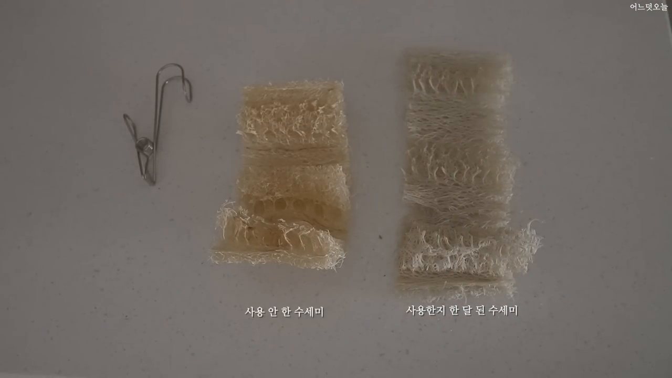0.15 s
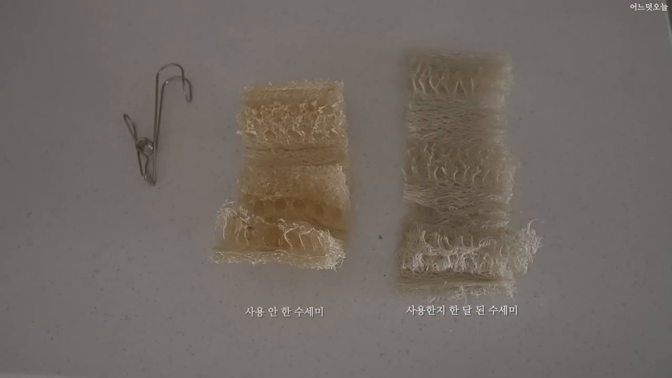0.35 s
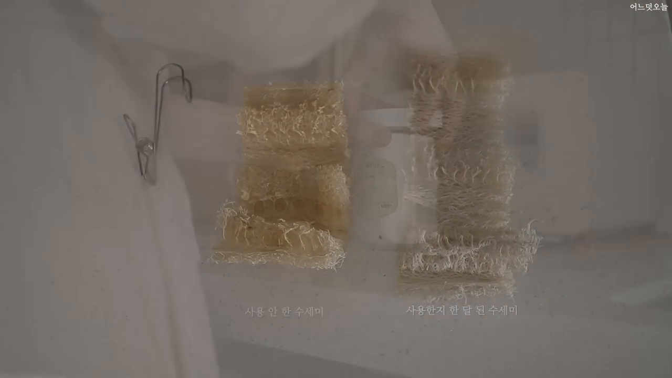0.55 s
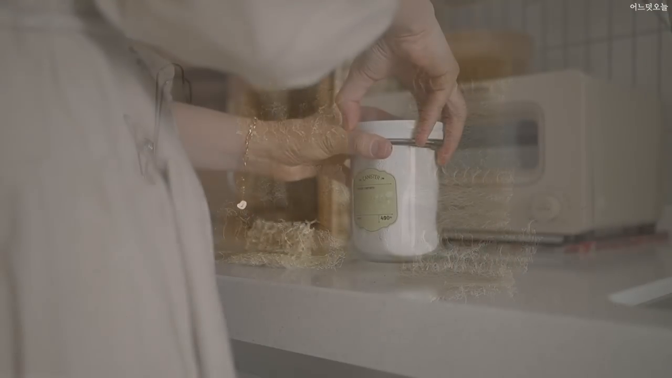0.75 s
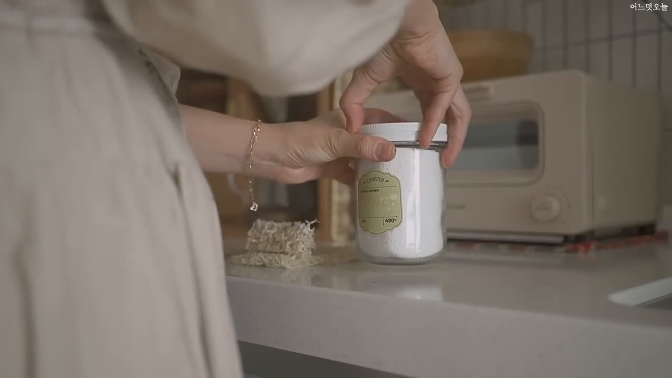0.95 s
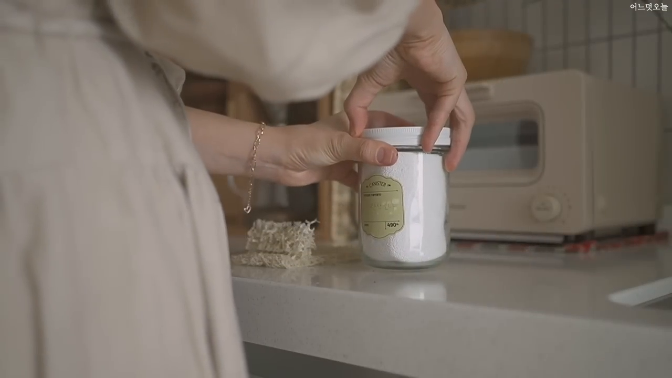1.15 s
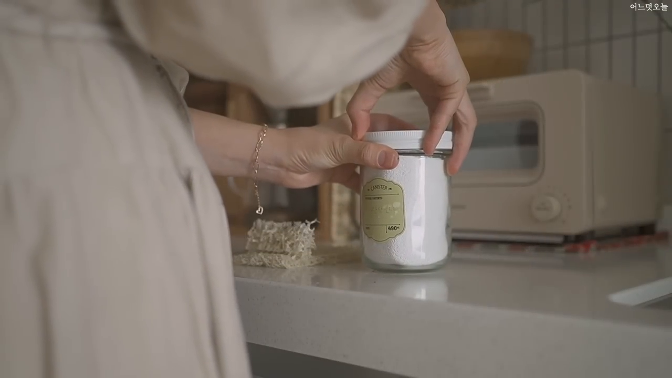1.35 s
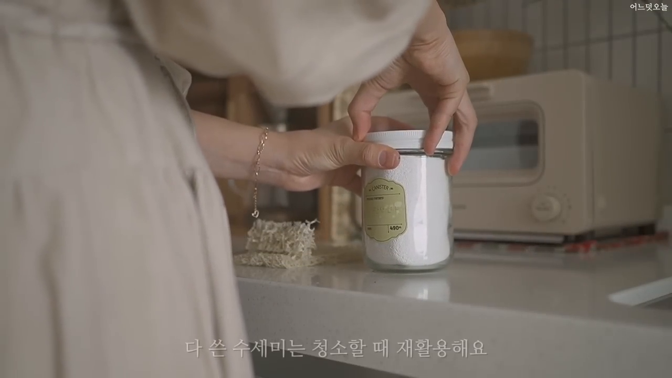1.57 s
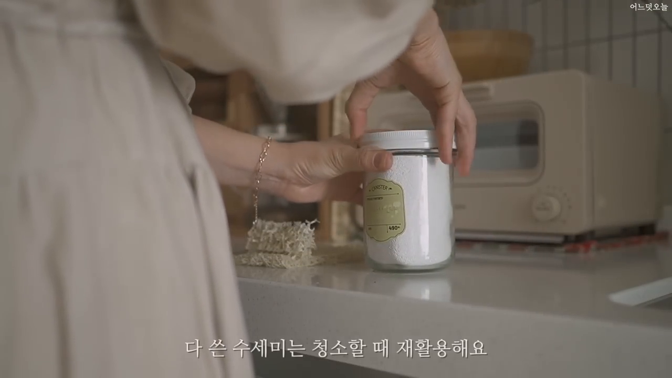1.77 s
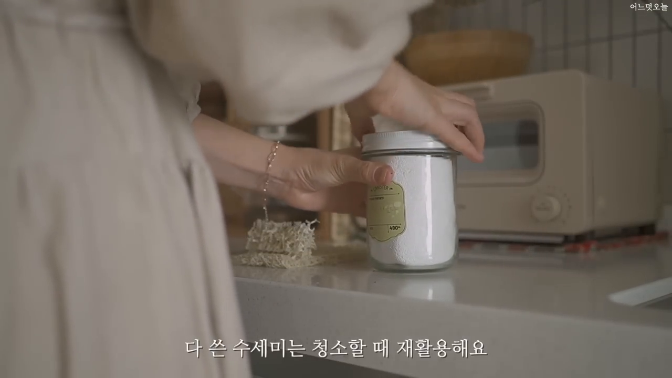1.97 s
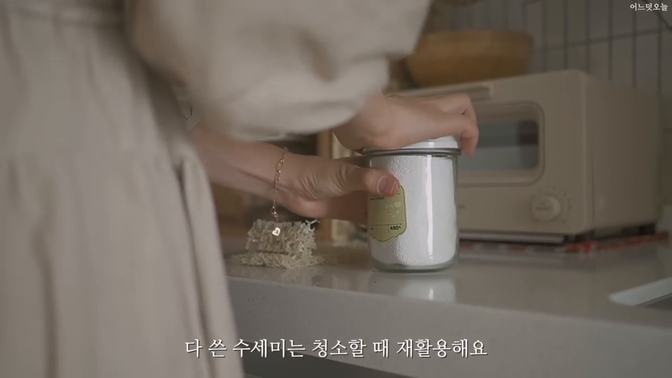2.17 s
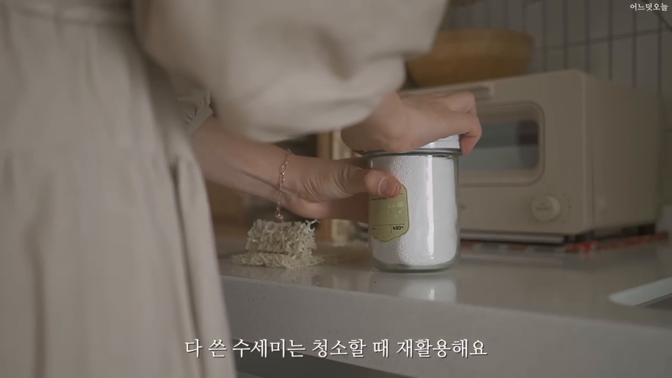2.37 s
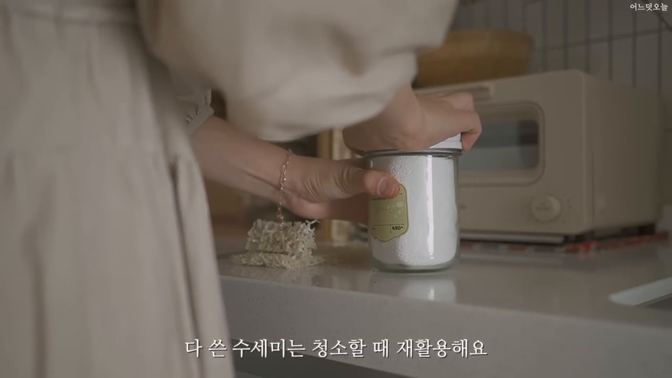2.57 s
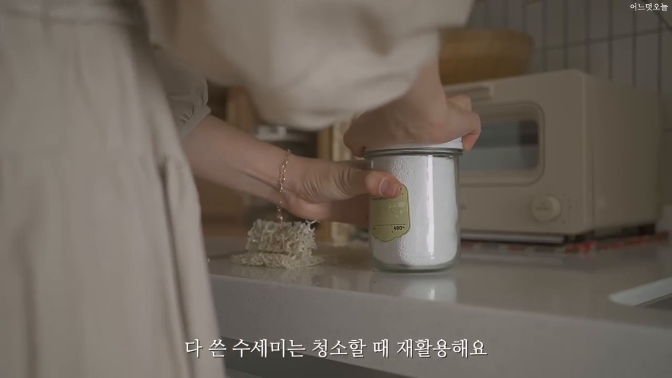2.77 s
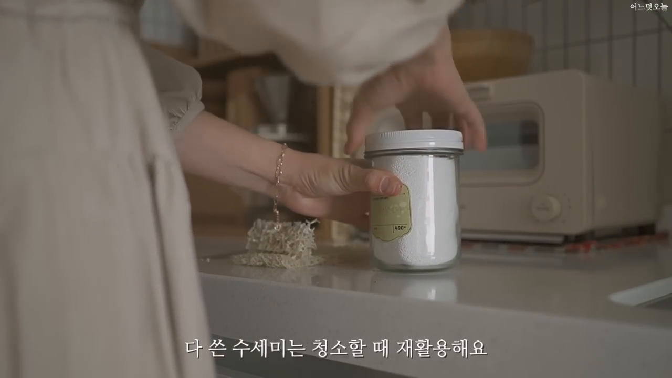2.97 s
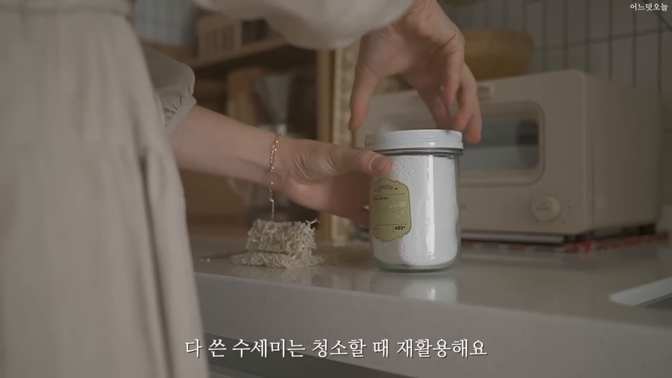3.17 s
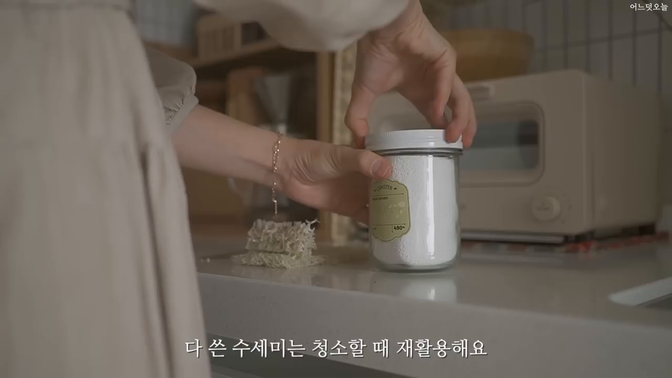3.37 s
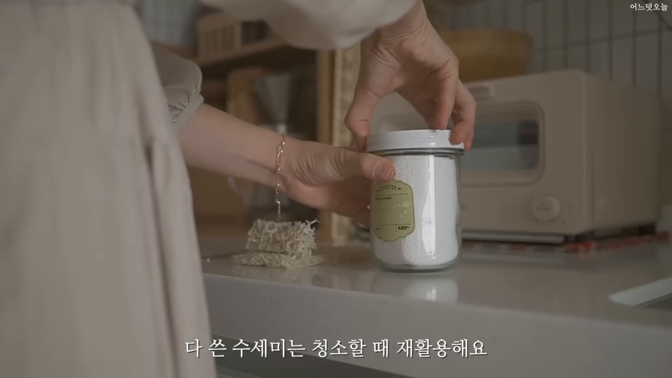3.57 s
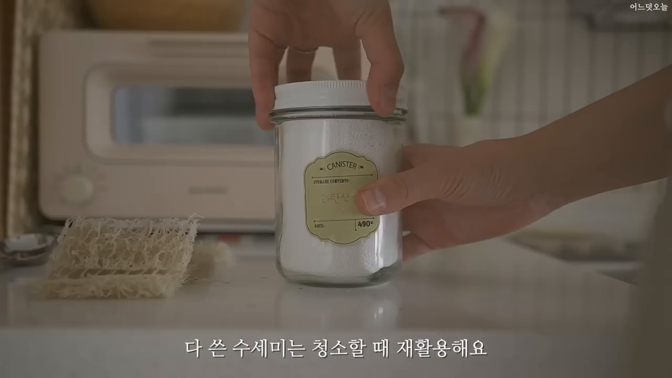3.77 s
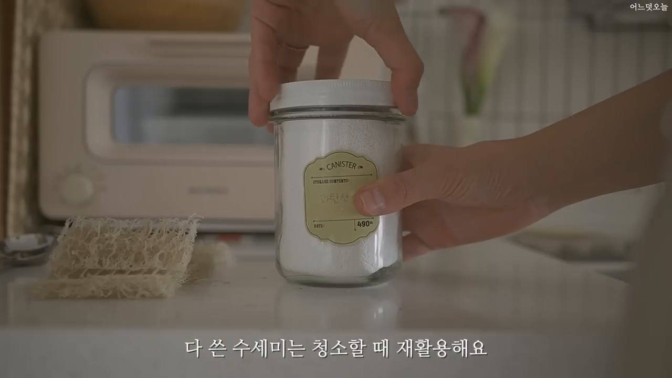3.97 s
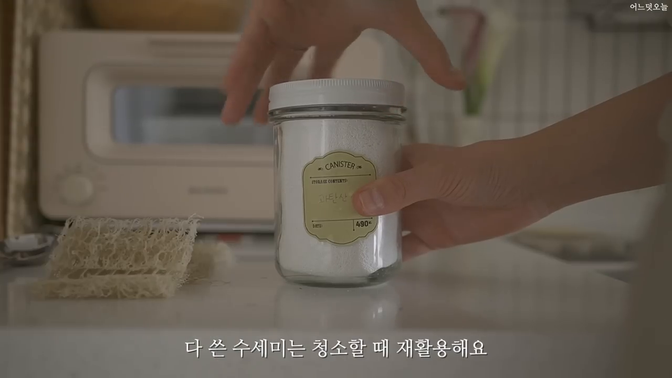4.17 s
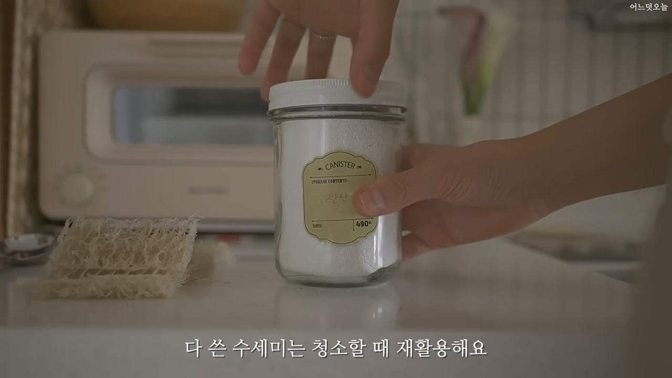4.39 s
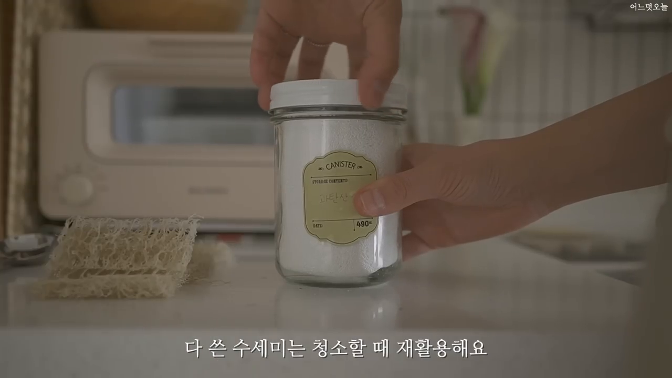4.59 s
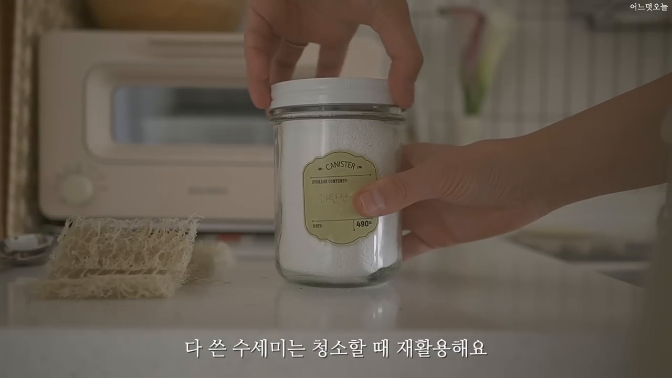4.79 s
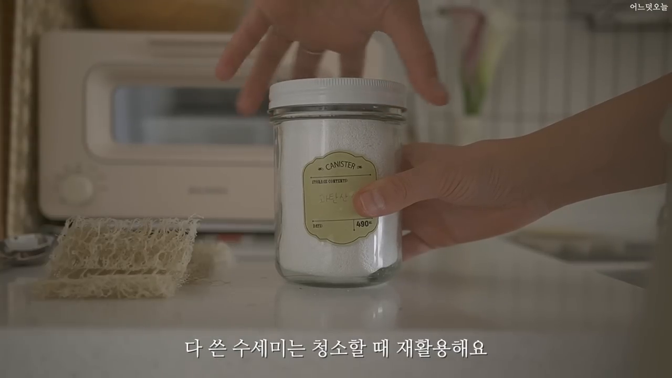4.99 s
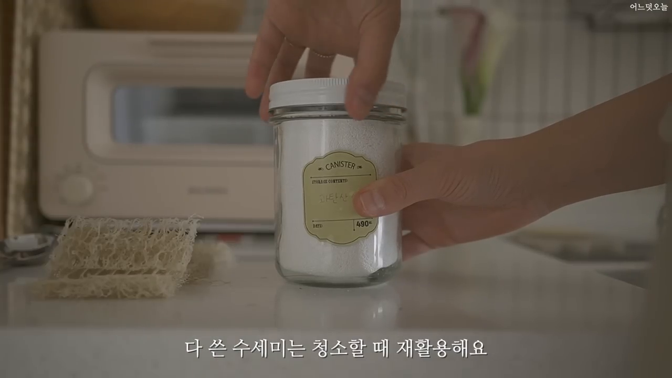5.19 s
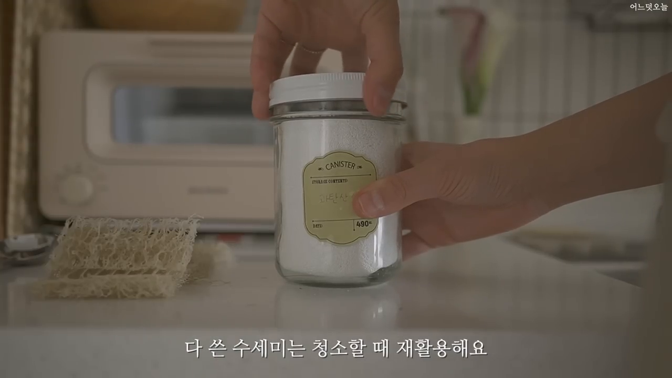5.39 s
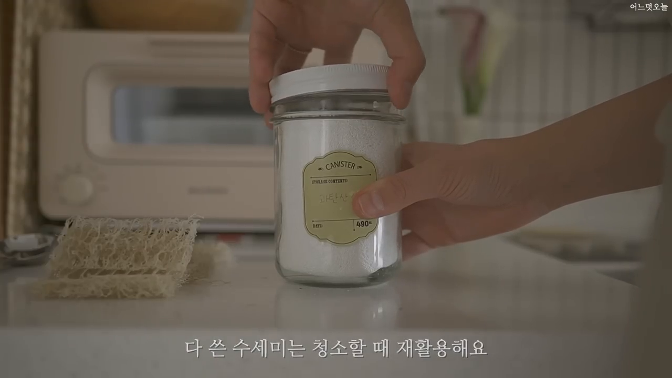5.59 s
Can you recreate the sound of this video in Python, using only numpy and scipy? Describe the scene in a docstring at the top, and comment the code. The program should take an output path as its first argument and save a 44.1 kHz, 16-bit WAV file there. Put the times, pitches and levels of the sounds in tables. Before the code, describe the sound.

Close, dry kitchen handling. Faint rumble and hiss open for over a second, then a plastic lid knocks and rubs on a full glass jar with low, woody counter booms. A brighter glassy scrape follows, then near quiet. The sound cuts abruptly and fades back in, with two clusters of firmer twisting strokes and clacks, a pause, and light rattly scrapes at the end.

```python
"""A hand twists a plastic screw lid on a full glass jar standing on a kitchen counter.
The thread rubs and slips in short strokes: random slips make the counter boom and the lid and jar ring.
A finer, denser scrape gives the hiss of rubbing. Taps on the lid ring and crack along with many strokes.
The sound drops out once and fades back in with other resonances. A quiet hiss lies under it all."""
import sys
import numpy as np
from scipy import signal
from scipy.fft import rfft, irfft, next_fast_len
from scipy.io import wavfile
from scipy.ndimage import uniform_filter1d, map_coordinates

SR = 44100
rng = np.random.default_rng(int(sys.argv[2]) if len(sys.argv) > 2 else 0)


def store_wav(level_fs):
    """Save 16-bit WAV to argv[1]."""
    pcm = np.round(np.clip(np.atleast_2d(level_fs), -1, 1) * 32767)
    wavfile.write(sys.argv[1], SR, pcm.T.astype(np.int16))


N = 248724  # length in samples

# Moments when the resonances change [s]: the palm presses down and the glass rings freely,
# the hand grips the glass again, the sound drops out, the lid comes off the thread.
LOOSE_S, HELD_S, GAP_S, LIFT_S = 2.45, 3.0, 3.743, 5.572


def amp(db):
    """Turn decibels into a gain."""
    return 10 ** (np.asarray(db) / 20)


def unit(x):
    """Scale to an average (RMS) strength of 1."""
    return x / np.sqrt(np.mean(x ** 2) + 1e-20)


def curves(rows):
    """Draw straight lines between the rows: one value per sample for each column after the time."""
    time_s, *columns = np.transpose(rows)
    return [np.interp(np.arange(N) / SR, time_s, column) for column in columns]


def wobble(rate, size=N):
    """A smooth random curve through `rate` random points a second."""
    points = rng.standard_normal(int(size * rate / SR) + 4)
    return map_coordinates(points, [np.arange(size) * rate / SR])


def filtered(x, response):
    """Change the strength of each frequency in x by the given response."""
    size = next_fast_len(N + SR // 2)
    hz = np.fft.rfftfreq(size, 1 / SR)
    return irfft(rfft(x, size) * response(hz), size)[:N]


def colour(points):
    """A filter gain drawn through (frequency [Hz], level [dB]) points, spaced by pitch."""
    point_hz, db = np.transpose(points)
    return lambda hz: amp(np.interp(np.log(hz + 1), np.log(point_hz + 1), db))


def slips(per_s, spread_db, smooth):
    """Friction force: random slips of uneven size over a smooth scrape, evened out in strength."""
    hit = rng.random(N) < per_s / SR
    direction = np.sign(rng.standard_normal(N))
    size = amp(spread_db * rng.standard_normal(N)) * direction
    force = unit(hit * size) + smooth * rng.standard_normal(N)
    nearby_power = np.abs(uniform_filter1d(force ** 2, size=900))
    return force / np.sqrt(nearby_power + 0.07)


def ringing(force, db, modes):
    """The force drives each resonance; the contact wanders, so their shares keep shifting."""
    out = np.zeros(len(force))
    for hz, width, level in modes:
        b, a = signal.iirpeak(hz, hz / width, SR)

        def resonate(x):
            """Pass the resonance twice, for steep flanks."""
            return signal.lfilter(b, a, signal.lfilter(b, a, x))

        share_db = 2.5 * wobble(40, size=len(force))
        driven = resonate(force * amp(db + share_db))
        out += amp(level) * np.sqrt(width) * driven / np.std(resonate(force))
    return out / np.sqrt(sum(amp(level) ** 2 * width for _, width, level in modes))


def by_state(force, db, states):
    """Each (start [s], resonances) state rings until the next one begins."""
    edges = [round(start * SR) for start, _ in states] + [N]
    lead = SR // 20  # start early so the resonances can build up
    parts = []
    for (_, modes), begin, end in zip(states, edges, edges[1:]):
        early = max(begin - lead, 0)
        part = ringing(force[early:end], db[early:end], modes)
        parts.append(part[begin - end:])
    return np.concatenate(parts)


def twisting():
    """The thread judders; each part of jar and counter answers the same uneven grip."""
    boom_db, lid_db, jar_db, neck_db, rub_db = grip()
    judder = wobble(90)
    push = slips(500, spread_db=4, smooth=0.9411) * amp(0.838 * judder)
    grit = slips(500, spread_db=1.0, smooth=1.0) * amp(0.5028 * judder)
    low_parts = counter(push, boom_db) + thud(push, boom_db) + lid(push, lid_db)
    glass_parts = jar(grit, jar_db) + neck(grit, neck_db)
    return low_parts + glass_parts + rub(judder, rub_db)


# Jerks and slides of the lid: (full strength [s], rise [s per 20 dB], hold [s], fall [s per 20 dB],
# boom [dB], lid [dB], jar ring [dB], neck ring [dB], rub hiss [dB]); rise, hold, fall ignore the sign
JERKS = [ (1.399, 0.0047, .001, .01, -27, -25, -48, -66, -72),
         (1.408, 0.0131, 0.06818, 0.0784, -30, -32.5, -61.5, -78.5, -82.5),
         (1.485, 0.1121, 0.033, 0.1095, -38, -39.5, -62, -64, -62),
         (1.585, -0.0026, .001, .01, -30, -28.5, -44, -64, -68),
         (1.593, 0.011, 0.009768, -0.032, -27.5, -29.5, -60.5, -82.5, -82.5),
         (1.619, 0.0244, 0.06345, .1, -30, -33, -53, -74, -79),
         (1.728, .03, .01, .03, -37, -45, -60, -62, -62),
         (1.702, 0.0703, 0.6107, 0.0564, -55.5, -56.5, -59.5, -60.5, -59.5),
         (1.749, .01, .016, .033, -25, -30, -49.5, -54.5, -52),
         (1.823, 0.0102, 0.01084, -0.0224, -32.5, -34.5, -54.5, -56.5, -56),
         (1.835, 0.0245, 0.001788, 0.0159, -24, -29, -51.5, -51, -50),
         (1.874, -0.0759, 0.05104, -0.0421, -34.5, -50.5, -73, -74, -66.5),
         (1.944, -0.001, 0.00999, 0.0575, -29, -39, -58, -58.5, -58),
         (1.956, 0.0156, 0.013105, 0.0359, -21.5, -32, -51, -53, -54),
         (2.031, 0.1145, 0.01225, 0.0571, -51.5, -44, -56, -66.5, -58),
         (2.066, 0.0097, 0.021307, -0.0079, -25.5, -35, -53.5, -51.5, -50.5),
         (2.104, -0.3745, 0.0097, 0.3293, -40.5, -52, -72, -64, -70.5),
         (2.340, 0.0006, 0.003287, .014, -41, -35, -35, -57.5, -60),
         (2.341, -0.0105, 0.011084, -0.0173, -41.5, -57.5, -59, -55, -54),
         (2.523, .02, .002, .012, -55.5, -67.5, -62.5, -67, -67.5),
         (2.554, .006, 0.003045, 0.0404, -40, -30, -40, -47.5, -52.5),
         (2.593, 0.0108, 0.009625, 0.0502, -31, -26.5, -30.5, -34, -38),
         (2.642, .02, .008, .022, -17, -32, -31, -37, -36),
         (2.662, 0.0167, .01, .13, -25.5, -38, -39, -43, -44),
         (2.735, .08, .045, .11, -33, -42, -42, -46, -50),
         (2.853, 0.1225, 0.00439, .16, -44, -51, -63, -60, -54.5),
         (2.972, .06, 0.00502, .04, -46, -56, -67, -62, -61),
         (3.048, 0.0121, .03, .014, -27, -42, -52.5, -51, -51),
         (3.141, 0.0489, 0.02939, 0.0811, -44, -56, -78, -74.5, -78),
         (3.101, 2.3557, 0.4787, 0.6814, -62.5, -66, -68.5, -67.5, -68.5),
         (3.394, -0.1844, 0.00464, 0.1886, -54, -60.5, -70, -72.5, -70),
         (3.521, 0.0909, 0.00189, 0.0696, -51, -49, -60, -71, -68),
         (3.628, 0.2196, 0.04547, 0.0852, -57, -58.5, -66, -67.5, -64.5),
         (3.729, 0.0533, 0.00867, 0.0138, -47.5, -43.5, -53, -54.5, -58),
         (3.800, .03, 0.001922, 0.0156, -59, -52, -58, -63.5, -59),
         (3.848, 0.0034, 0.012253, 0.0405, -28, -28, -41, -48.5, -46.5),
         (3.897, 0.0217, .03, .025, -42.5, -47, -52, -65, -57.5),
         (3.967, 0.0018, 0.00555, 0.0633, -19, -19.5, -57, -48.5, -46),
         (3.999, 0.0425, 0.01353, 0.0287, -26, -23, -32.5, -46, -40.5),
         (4.028, -0.0175, 0.007484, 0.0368, -21, -37.5, -51.5, -55.5, -50),
         (4.078, .012, 0.03785, 0.0367, -33, -35, -42.5, -52, -56),
         (4.119, 0.0582, 0.018267, 0.0322, -31, -30, -34.5, -48, -41),
         (4.188, 0.7529, .01, 0.3273, -56.5, -63.5, -78, -78, -76.5),
         (4.522, -0.0191, 0.01594, 0.6171, -49, -52.5, -58, -68, -58.5),
         (4.549, .012, 0.001925, .018, -39, -33, -44, -55.5, -48),
         (4.566, 0.0129, 0.00441, -0.0043, -40.5, -40.5, -46, -56, -46.5),
         (4.607, 0.0041, 0.01692, 0.0835, -44, -41.5, -50, -56.5, -51.5),
         (4.637, 0.0167, 0.010965, 0.0008, -44, -30, -46, -49, -48),
         (4.654, 0.0301, 0.018723, 0.0145, -37, -28.5, -38, -44.5, -44.5),
         (4.725, 0.0377, .008, 0.0607, -31, -33, -60, -56.5, -50.5),
         (4.743, 0.0286, 0.03054, 0.0354, -31, -28, -34.5, -49, -43),
         (4.805, 0.0076, 0.02474, 0.0421, -34, -35.5, -42, -56, -53.5),
         (4.835, 0.0315, 0.004817, 0.0466, -35, -31, -39, -47.5, -48.5),
         (4.861, .025, .003, .02, -49.5, -47.5, -46, -49, -44.5),
         (4.904, -0.6924, 0.00949, 0.2149, -59.5, -69.5, -74, -80.5, -73),
         (5.298, .011, 0.01068, 0.0722, -39.5, -39, -44, -45, -46),
         (5.326, 0.0022, 0.0049, 0.0713, -45.5, -46, -43, -53, -52),
         (5.353, 0.0204, 0.00761, -0.0794, -38.5, -36.5, -49.5, -51, -53),
         (5.378, 0.0568, 0.01073, -0.0541, -40.5, -43, -58, -59, -58.5),
         (5.396, 0.0187, 0.00835, -0.0763, -40, -39.5, -46.5, -55, -49),
         (5.415, .006, .008, .022, -39, -31, -44, -41, -40),
         (5.463, 0.0593, 0.0122, 0.2783, -42, -45.5, -56, -60, -57),
         (5.489, 0.0505, 0.0426, 0.0761, -39.5, -40, -49.5, -53.5, -52),
         (5.553, 0.0526, 0.0165, -0.23, -41.5, -40, -55.5, -57, -60),
         (5.579, .012, .016, .02, -46, -40, -40, -45, -48),
         (5.592, .015, .003, .012, -47, -44, -41, -39, -44),
         (5.606, .015, .009, .012, -50, -45, -48, -48, -50),
         (5.624, .02, .004, .03, -57, -52, -63, -68, -66), ]
# Narrow resonances build up slowly, so each part's level curve is started this early:
# (boom [s], lid [s], jar ring [s], neck ring [s], rub hiss [s])
EARLY_S = [0.0058815, 0.001855, 0.0000031, 0.000615, 0.00029]


def grip():
    """Each jerk swells, holds and dies away; their powers add up to one level in dB for each part."""
    t = np.arange(0, N + 32, 32) / SR
    power = 1e-10
    for full_s, rise, hold, fall, *parts_db in JERKS:
        before = np.maximum(full_s - t, 0) / abs(rise)
        after = np.maximum(t - full_s - abs(hold), 0) / abs(fall)
        shape_db = -20 * (before + after)
        power = power + amp(2 * np.add.outer(parts_db, shape_db))  # doubled dB turns gain into power
    return [np.interp(np.arange(N) / SR + early, t, 10 * np.log10(p)) for p, early in zip(power, EARLY_S)]


# Counter resonances before the gap, under the pressing palm, and after the gap:
# (frequency [Hz], width of one filter pass [Hz], relative level per Hz [dB])
COUNTER_BEFORE = [(110.23, 55.05, -11), (149.07, 40.14, -0.5), (205.51, 51.22, -1.5), (235.69, 59.71, -1.5),
                  (332.41, 76.43, -5.5)]
COUNTER_PALM = [(100.82, 44.76, -2.5), (154.13, 38.95, 0), (199.05, 56.94, -1), (247.79, 73.79, -8),
                (336.4, 96.15, -12.5)]
COUNTER_AFTER = [(117.1, 61.5, -11.5), (153.3, 43.02, -5), (201.68, 50.5, -6.5), (248.07, 95.54, -5),
                 (307.35, 69.37, -6.5)]


def counter(push, db):
    """The push of the thread sets the counter booming at its low resonances."""
    return by_state(push, db, [(0, COUNTER_BEFORE), (LOOSE_S, COUNTER_PALM), (GAP_S, COUNTER_AFTER)])


def thud(push, db):
    """The worktop's dull give: one broad resonance at 55 Hz, 24 dB under the boom."""
    return ringing(push, db - 24, [(55, 60, 0)])


# Lid resonances before the gap, under the pressing palm, after the gap, and coming off the thread:
# (frequency [Hz], width of one filter pass [Hz], relative level per Hz [dB])
LID_BEFORE = [(444.75, 93.03, 11), (597.93, 178.8, 8), (911.28, 147.8, 4.5), (1030.1, 288.77, -1.5),
              (1290.3, 134.28, -1.5), (1990, 1560, -48)]
LID_PALM = [(480, 150, 2), (630.03, 130, 3), (1010, 200, -1), (1330, 200, -5), (906.7, 876, -8)]
LID_AFTER = [(473.1, 95, -11), (556.36, 160.75, 1), (630.3, 151.45, 3), (858.18, 296.2, -13.5),
             (995, 50, -6), (1234.5, 393.4, -13), (1435.7, 40, -14)]
LID_LIFTED = [(599, 360, -4.5), (959.52, 56.53, -0.5), (1482.8, 60.1, 1.5), (1200.6, 693.6, -11.5)]


def lid(push, db):
    """The same push rings the plastic lid, whose resonances change from state to state."""
    return by_state(push, db, [(0, LID_BEFORE), (LOOSE_S, LID_PALM), (HELD_S, LID_BEFORE),
                               (GAP_S, LID_AFTER), (LIFT_S, LID_LIFTED)])


# Glass damped by the hand, two rows for the jar and then two for the neck:
# (frequency [Hz], width of one filter pass [Hz], relative level per Hz [dB])
GRIPPED = [(1928.4, 1340, 6), (2634, 1226, 0), (4350.1, 1496.4, 4), (5524.2, 1828, -1.5)]
# Jar resonances under the pressing palm, and after the gap; same columns:
# (frequency [Hz], width of one filter pass [Hz], relative level per Hz [dB])
JAR_PALM = [(2149.2, 169.7, -0.5), (2461.1, 200, 1.5), (3005.2, 134.6, -12.5), (3241.6, 140.6, -7),
            (3663.5, 224.6, -2.5), (2841.7, 1541, -7)]
JAR_AFTER = [(1993.8, 353.2, -4), (2208.9, 154.27, 1.5), (2352.2, 317.37, 3.5), (2835.7, 295.6, -4.5),
             (3041.2, 141.46, -1.5), (3335.3, 138, -1), (3559.5, 250.76, 1.5), (2683.5, 1314.2, -8.5)]


def jar(grit, db):
    """The gritty slips ring the glass; a gripping hand makes its resonances broad and dull."""
    return by_state(grit, db, [(0, GRIPPED[:2]), (LOOSE_S, JAR_PALM), (HELD_S, GRIPPED[:2]), (GAP_S, JAR_AFTER)])


# Glass thread ringing freely:
# (frequency [Hz], width of one filter pass [Hz], relative level per Hz [dB])
NECK = [(4267.5, 309.5, 2.5), (4814.6, 298.1, 3.5), (5170, 300, -3), (5460.6, 85.3, -23),
        (6502.1, 333, -4.5), (5425.3, 861.7, -3.5)]


def neck(grit, db):
    """The same slips ring the glass thread at the neck, higher than the jar."""
    return by_state(grit, db, [(0, GRIPPED[2:]), (LOOSE_S, NECK), (HELD_S, GRIPPED[2:]), (GAP_S, NECK)])


# Tone of the rubbing: (frequency [Hz], relative level per Hz [dB])
RUB = [(3530, -9.5), (6000, -9.5), (6780, -2), (7470, -2), (8820, 0.5), (12700, -2.5), (15800, -10)]


def rub(judder, db):
    """Thousands of tiny slips a second, shaken by the judder, blur into a hiss."""
    scrape = slips(4000, spread_db=3, smooth=1.5) * amp(judder)
    return amp(db) * unit(filtered(scrape, colour(RUB)))


# Taps on the lid: (time [s], level [dB], favoured pitch [Hz], crack against ring before a fixed boost [dB])
TAPS = [(1.394, -17.5, 1285, -15.5), (1.582, -16, 1298, -16), (2.337, -19, 1493, -44.5),
        (2.552, -18, 960.8, -19.5), (2.596, -13, 1037, -19.5), (2.696, -23, 5100, -15),
        (2.968, -28, 5200, -12), (3.846, -28.5, 636.2, -29), (3.965, -21.5, 594, -28),
        (4.028, -15.5, 686.9, -27), (4.547, -28, 1683, -29), (4.669, -15.5, 488.5, -37.5),
        (4.714, -32, 900, -27), (4.841, -34.5, 620, -25.5), (5.414, -26, 620, -16)]
# Ways the tapped lid rings: (frequency [Hz], relative level [dB], time to fall by 60 dB [s])
TAP_MODES = [(243.18, 0.5, 0.05486), (520.4, 3.5, 0.02487), (668.06, 1.5, 0.013367),
             (753.56, 2.5, 0.015174), (999.23, -7, 0.04931), (1317.1, -3, 0.02062), (1924.6, -10, 0.02088),
             (1961.6, 2, 0.010738), (2579, -9.5, 0.02787), (3079.7, -5, 0.015026), (3390, -29.5, 0.03464),
             (5060.2, 0, 0.00904)]


def taps():
    """Each tap rings the lid's modes, most those near its own pitch, and cracks."""
    out = np.zeros(N + SR)
    t = np.arange(SR // 5) / SR
    for start, db, pitch, crack_db in TAPS:
        level_draws, pitch_draws = rng.standard_normal((2, len(TAP_MODES)))
        ring = np.zeros(len(t))
        for k, (hz, level, t60) in enumerate(TAP_MODES):
            octaves_away = abs(np.log2(hz / pitch))
            mode_db = level + 2.642 * level_draws[k] - 11.091 * octaves_away - 60 * t / t60
            mode_hz = hz * (1 + 0.01781 * pitch_draws[k])
            ring += (-1) ** k * amp(mode_db) * np.sin(2 * np.pi * mode_hz * t)
        onset = 1 - np.exp(-t / 0.0003435)
        noise = rng.standard_normal(len(t))
        snap = 3 * signal.lfilter(*signal.butter(2, 4500, fs=SR), noise)  # duller towards the top
        crack = snap * amp(crack_db + 2.5 - 60 * t / 0.004513)  # gone within milliseconds
        first = round(start * SR)
        out[first:first + len(t)] += amp(db) * (ring / np.abs(ring).max() * onset + crack)
    return out[:N]


def kitchen(x):
    """A short room tail: fading noise that takes 0.3 s to fall by 60 dB, after a 6 ms wait."""
    t = np.arange(SR // 3) / SR
    tail = rng.standard_normal(len(t)) * amp(-60 * t / 0.3006) * (t > .006)
    return signal.fftconvolve(x, tail / np.linalg.norm(tail))[:N]


# Tone of the background: (frequency [Hz], relative level per Hz [dB])
ROOM = [(15, -52.5), (25, -16.5), (53, -7.5), (126, -12.5), (161, -6.5), (316, -11), (449, -17),
        (500, -16.5), (769, -18), (905, -20), (15800, -28.5)]
# Background loudness, apart from the two brief dips: (time [s], level [dB])
FLOOR = [(0, -59), (.5, -60), (.7, -62), (.9, -59), (2.35, -56.5), (2.37, -63), (2.53, -61.5), (3.1, -57),
         (3.74, -59.5), (4.3, -58), (5.64, -60.5)]


def hiss():
    """Rumble and hiss from coloured noise; the level dips briefly just after the first two taps."""
    level_db, = curves(FLOOR)
    t = np.arange(N) / SR
    dip_db = sum(-6 * np.exp(-((t - start - .024) / 0.01837) ** 2) for start, *_ in TAPS[:2])
    return amp(level_db + dip_db) * unit(filtered(rng.standard_normal(N), colour(ROOM)))


def scene():
    """Twisting and taps with a faint room tail, over the background hiss."""
    handling = twisting() + taps()
    return (handling + amp(-29.0) * kitchen(handling) + hiss())[None]


def record(dry):
    """The sound drops out and fades back in; deep bass is weakened and the top is cut off."""
    fade_s, bass_hz, top_hz = 0.0668, 35, 15900
    since_gap = np.arange(N) / SR - GAP_S
    gain = np.where(since_gap < 0, 1, np.clip(0.01425 + since_gap / fade_s, 0, 1))

    def response(hz):
        """A gentle low cut and a sharp high cut."""
        low_cut = (1j * hz / (bass_hz + 1j * hz)) ** 2
        return (hz < top_hz) * low_cut

    return filtered(dry[0] * gain, response)[None]


dry = scene()
out = record(dry)
store_wav(out)
```